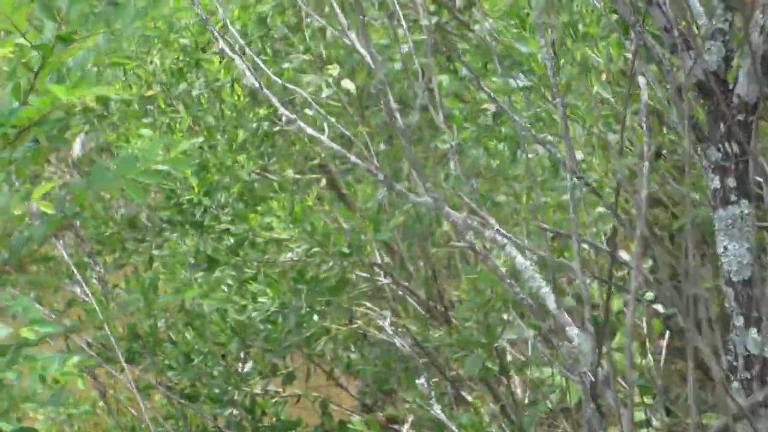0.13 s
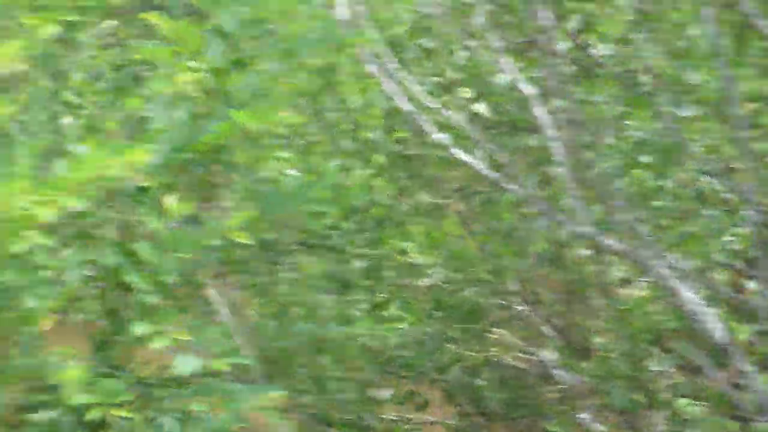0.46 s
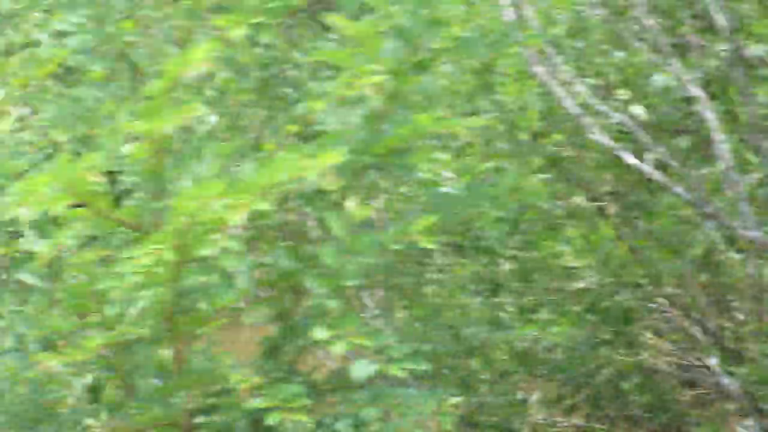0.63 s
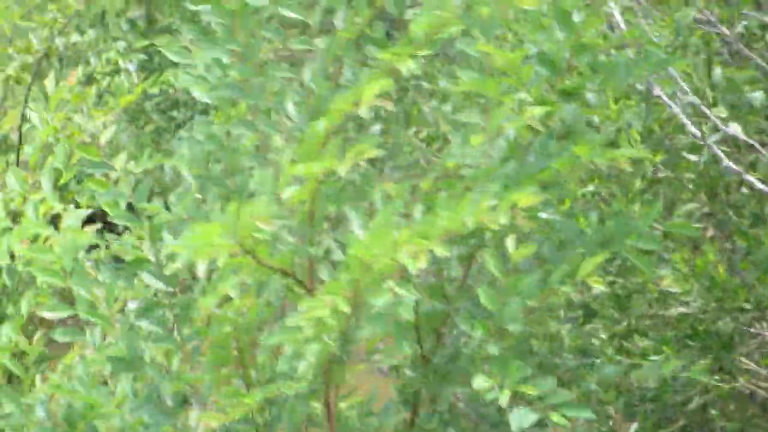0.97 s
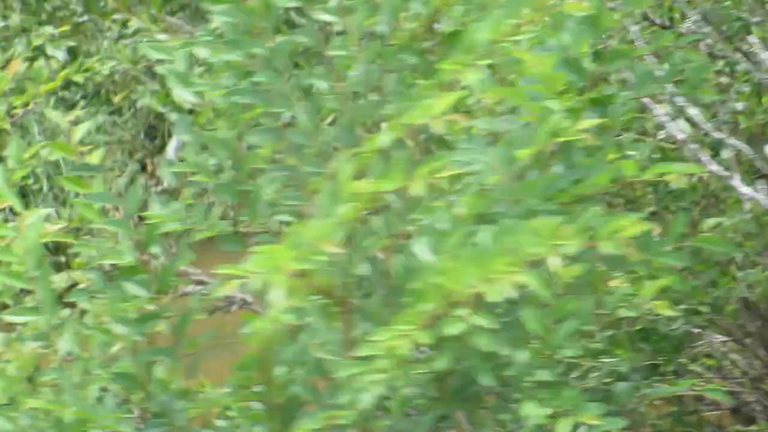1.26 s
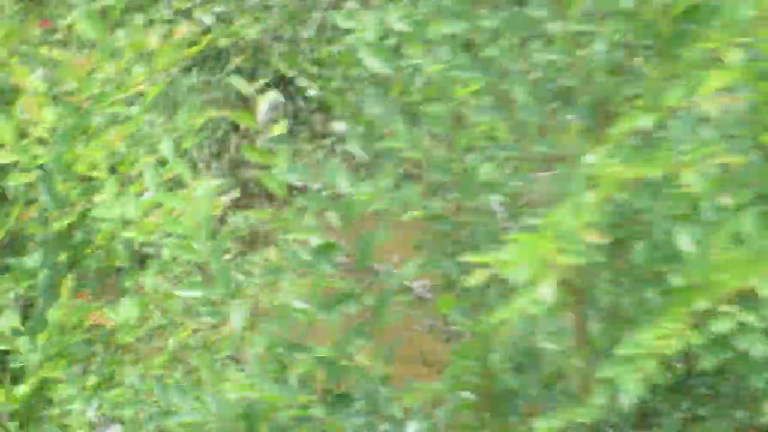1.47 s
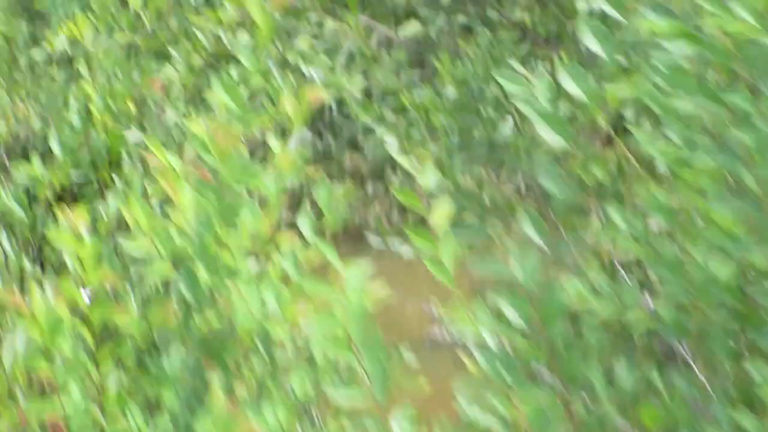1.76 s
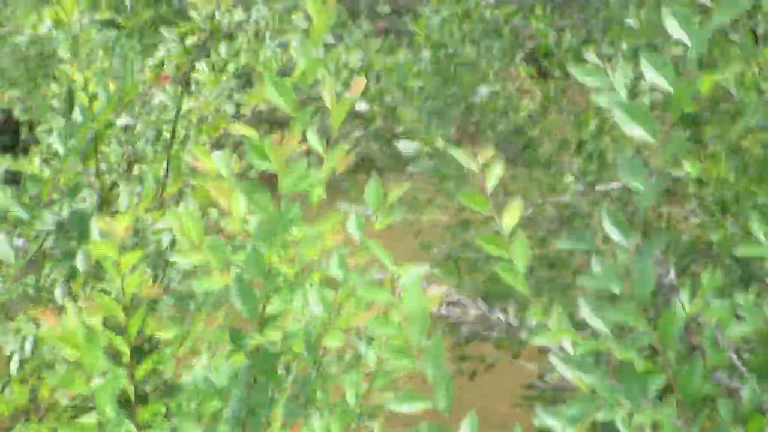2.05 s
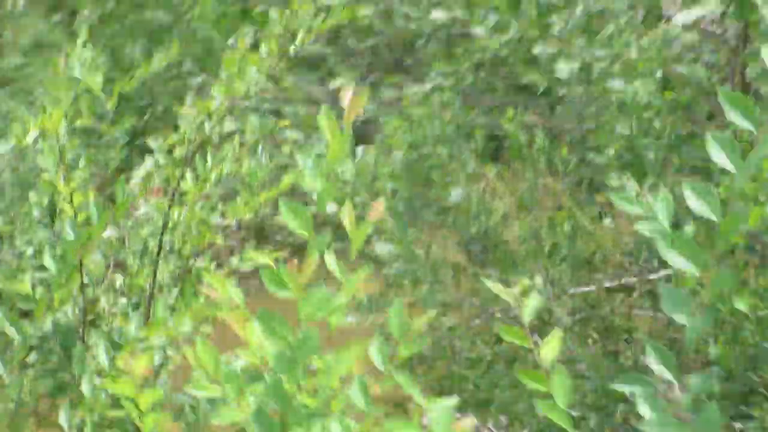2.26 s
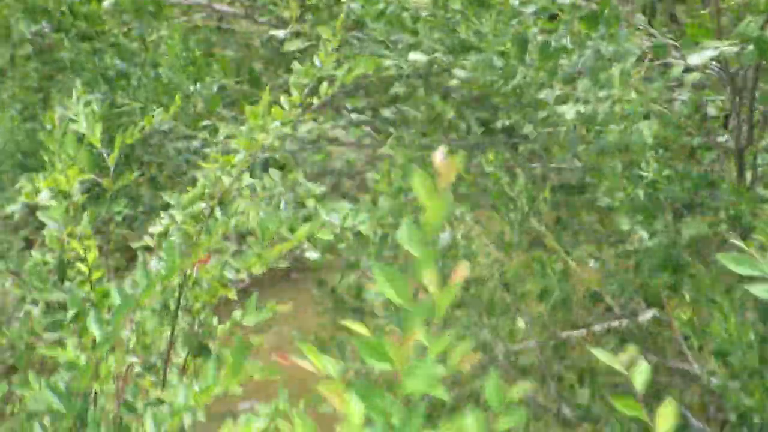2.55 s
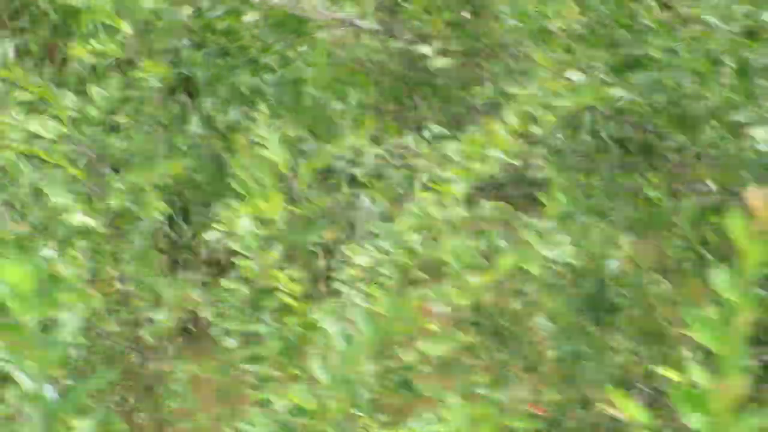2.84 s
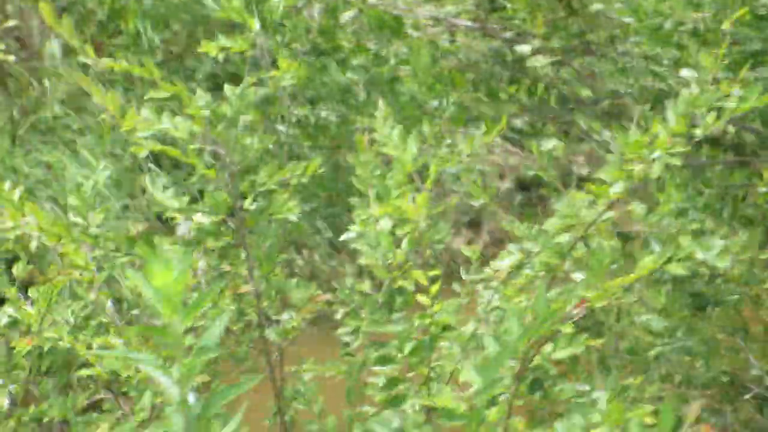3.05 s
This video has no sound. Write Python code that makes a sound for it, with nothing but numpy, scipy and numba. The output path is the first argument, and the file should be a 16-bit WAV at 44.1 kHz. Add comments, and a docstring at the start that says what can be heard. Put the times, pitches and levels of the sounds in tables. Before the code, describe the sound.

Sharp, very short chirps of small birds sweep upward at about 0.2, 0.5, 0.8 and 0.95 seconds, scattered by leaves, with faint farther whistles between. Distant traffic rumble, soft leaf hiss and a thin insect shimmer continue throughout. Wind thumps the camera microphone from 0.9 to 2.0, eases, then buffets hard from 2.4 onward; chirps return around 2.65, 2.75 and 2.95. Small twig ticks are scattered.

```python
"""A wash of distant road traffic and leaf hiss, shaped noise, runs throughout, with faint faraway whistles.
Small birds chirp in dense shrubs: gliding tones, each scattered by the leaves into a shimmering noise tail.
Thin bands of noise make insects, soft-edged bursts of ringing make twig ticks, and gusts of filtered
impulses with single thumps buffet the camera's microphone. The camera's gain control dips under
strong gusts, and two faint high tones of its electronics beat together."""
import sys
import numpy as np
from scipy import signal
from scipy.fft import rfft, irfft
from scipy.io import wavfile
from scipy.ndimage import uniform_filter1d
from numba import njit

SR = 44100
rng = np.random.default_rng(int(sys.argv[2]) if len(sys.argv) > 2 else 0)


def persist_wave(psi):
    """Save psi, clipped to +-1, as 16-bit WAV."""
    counts = np.round(np.clip(psi, -1, 1) * 32767).astype(np.int16)
    wavfile.write(sys.argv[1], SR, np.atleast_2d(counts).T)


N = 141561
T = np.arange(N) / SR  # time in s
F = np.maximum(np.arange(N // 2 + 1) * SR / N, 1)  # spectrum bins in Hz


def undb(db):
    """Decibels to gain."""
    return 10 ** (np.asarray(db) / 20)


def level(x, db):
    """Scale to an rms level."""
    return x * undb(db) / np.sqrt(np.mean(x ** 2))


def over_hz(table, order=1):
    """Read one column of a frequency table at every bin, evenly in log frequency."""
    table = np.array(table)
    return np.interp(np.log(F), np.log(np.maximum(table[:, 0], 1)), table[:, order])


def pan(x, db):
    """Place a sound by its level difference, left over right."""
    return x * undb(np.array([[db / 2], [-db / 2]]))


def walk(rate):
    """Random levels held 1 / rate s and smoothed twice; spread 1."""
    hold = int(SR / rate)
    steps = np.repeat(rng.standard_normal(N // hold + 1), hold)
    x = uniform_filter1d(uniform_filter1d(steps, hold), hold)[:N]
    return x / x.std()


def road():
    """Distant traffic and leaf hiss: noise that reaches the left port first, each octave flickering."""
    # spectrum of the wash before its overall level is set: f/Hz, level/dB per Hz
    wash = [(18, -57.5), (30, -23), (64, -4.5), (104, 2.5), (167, -3), (260, -7.5), (360, -13), (680, -14),
            (1000, -12.5), (1860, -23), (3000, -35), (4000, -42), (5000, -45), (6000, -41), (8300, -46.5),
            (9500, -54), (12000, -58.5), (15500, -63)]
    # likeness of the two channels: f/Hz, likeness (0 to 1)
    likeness = [(50, .9995), (120, .997), (250, .97), (500, .84), (1000, .9), (2000, .7), (4500, .7),
                (8500, .55), (13000, .35)]
    # balance of the wash: f/Hz, left over right level/dB
    balance = [(100, -6), (310, 4.5), (540, -2), (940, -0.5), (2830, -2), (4900, 1), (8500, 0.5)]
    road_db, left_lead_s = -29, 0.00009
    flicker_db, flicker_per_s = 0.42, 3.98
    alike = np.clip(over_hz(likeness), 0, 1)
    shared, own_left, own_right = rfft(rng.standard_normal((3, N)))
    common = np.sqrt(alike) * shared
    apart = np.sqrt(1 - alike)
    tilt = undb(over_hz(balance) / 2)
    left = (common * np.exp(2j * np.pi * F * left_lead_s) + apart * own_left) * tilt
    right = (common + apart * own_right) / tilt
    spec = np.array([left, right]) * undb(over_hz(wash))
    out = 0
    for octave in range(10):
        # overlapping octaves centred on 32 Hz and its doublings
        band = np.cos(np.pi / 2 * np.clip(np.log2(F / 32) - octave, -1, 1)) ** 2
        out = out + irfft(spec * band, N) * undb(flicker_db * walk(flicker_per_s))
    return level(out, road_db)


def through_air(x):
    """Distance dulls the top of the bird calls; they reach the left port first."""
    left_lead_s, dull_hz = 0.00014, 13600
    lead = np.exp(2j * np.pi * F * left_lead_s * np.array([[1], [0]]))
    return irfft(rfft(x) * lead / np.sqrt(1 + (F / dull_hz) ** 20), N)


def leaf_scatter(wet_db, t60_s):
    """Direct sound, then noise fading at three rates as leaves return it, partly alike left and right."""
    early_t60_s, early_db = 0.11, 1
    late_t60_s, late_db = 0.68, -20.5
    t = T[:SR // 2]
    early = undb(early_db - 60 * t / early_t60_s)
    late = undb(late_db - 60 * t / late_t60_s)
    noise = rng.standard_normal((3, len(t)))
    tail = (noise[:2] + 0.5 * noise[2]) * (early + undb(-60 * t / t60_s) + late)
    tail = tail * undb(wet_db) / np.sqrt(np.sum(tail ** 2, axis=1, keepdims=True))
    tail[:, 0] = 1  # the direct sound
    return tail


def birds(calls, attack_share, t60_s):
    """Whistled glides with one overtone, each heard direct and scattered by the leaves around its perch."""
    release_s, flutter_db, flutter_per_s = 0.0034, 3.5, 250
    overtone_fade_db = -8  # the overtone weakens over the note
    out = np.zeros((2, N + 2 * SR))  # room for the last tails
    flutter = undb(flutter_db * walk(flutter_per_s))
    for start, length, first, middle, last, db, swell_db, over_db, wet_db, pan_db in calls:
        i = int(max(start, 0) * SR)
        u = T[:int(length * SR)] / length  # progress through the note, 0 to 1
        # a parabola through the first, middle and last pitch
        hz = first + (4 * middle - 3 * first - last) * u + 2 * (first + last - 2 * middle) * u ** 2
        phase = 2 * np.pi * np.cumsum(hz) / SR
        attack = np.minimum(u / attack_share, 1)
        release = np.minimum((1 - u) * length / release_s, 1)
        loudness = np.sqrt(2) * undb(db + swell_db * (u + 0.5))
        overtone = undb(over_db + overtone_fade_db * u) * np.sin(2 * phase)
        note = loudness * attack * release * flutter[i:i + len(u)] * (np.sin(phase) + overtone)
        heard = signal.fftconvolve(pan(note, pan_db), leaf_scatter(wet_db, t60_s), axes=1)
        out[:, i:i + heard.shape[1]] += heard
    return through_air(out[:, :N])


def far_birds():
    """Farther whistles with a quick attack and a shorter scatter."""
    # calls: start t/s, length t/s, first f/Hz, middle f/Hz, last f/Hz, level/dB before swell,
    # swell over the note/dB, overtone at the start/dB, leaf scatter over direct/dB, left over right/dB
    far_calls = [(.0, .012, 4300, 3950, 3600, -68, 0, -40, 8, 0),
                 (.37, .03, 2700, 2900, 3050, -62, 0, -40, 2, 0),
                 (.4, .05, 3100, 3550, 3450, -67, 0, -40, 4, 0),
                 (.455, .03, 3200, 3000, 2900, -59, 0, -40, 0, 0),
                 (1.58, .055, 3200, 3700, 4250, -64, -4, -40, 0, 0),
                 (1.635, .125, 4300, 3850, 2900, -63, 4, -40, 0, 0),
                 (2.027, .02, 10600, 8600, 7850, -65, 14, -40, 0, 0),
                 (2.062, .017, 4700, 3950, 3350, -58, 6, -40, -6, 0),
                 (2.425, .235, 6750, 6630, 6600, -65, 2, -40, -6, 0)]
    return birds(far_calls, attack_share=0.1, t60_s=0.21)


def near_birds():
    """Close chirps that rise in pitch, with a slower attack and a longer scatter."""
    # chirps: start t/s, length t/s, first f/Hz, middle f/Hz, last f/Hz, level/dB before swell,
    # swell over the note/dB, overtone at the start/dB, leaf scatter over direct/dB, left over right/dB
    near_chirps = [(.209, 0.035, 5100, 6920, 8200, -51, 3, -9.5, 10.5, 2),
                   (.492, 0.037, 6200, 7230, 8080, -53.5, 5, -15, 9, 2.5),
                   (.62, 0.02, 7000, 7400, 8200, -70, 0, -30, 11, 4),
                   (.819, 0.047, 5700, 7100, 8370, -56, 3, -15, 11.5, 2),
                   (.956, .042, 6330, 7280, 8300, -56.5, 0.5, -22, 12.5, 3.5),
                   (2.654, 0.032, 6150, 7300, 8330, -57.5, 6.5, -24, -5, 1),
                   (2.744, 0.026, 7200, 7540, 8450, -45, -2, -32, -5, 4),
                   (2.932, .043, 5770, 7050, 8220, -53, 6.5, -12, 5, 3.5)]
    return birds(near_chirps, attack_share=0.3, t60_s=0.27)


def insects():
    """Thin wavering bands of noise high in the treble, separate in each channel."""
    # bands: centre f/Hz, width f/Hz, level/dB before fades, middle of fade-in t/s, middle of fade-out t/s
    bands = [(8750, 25, -75.5, 0.5, .6), (8210, 290, -69, -0.7, 3.2), (8000, 150, -69, 1.5, 2.25)]
    fade_s = 0.2
    out = 0
    for hz, width, db, start, end in bands:
        noise = rfft(rng.standard_normal((2, N)))
        band = irfft(noise * np.exp(-((F - hz) / width) ** 2), N)
        fade = np.clip(np.minimum(T - start, end - T) / fade_s + 0.5, 0, 1)
        out = out + level(band, db) * fade
    return out


def gusts():
    """Random impulses of uneven size, filtered to a rumble that swells and brightens with the wind."""
    # wind strength at the microphone before calm and trim: t/s, level/dB
    strengths = [(0.4, -36.5), (0.89, -29.5), (0.91, -16.5), (1.01, -31), (1.05, -13.5), (1.16, -23),
                 (1.19, -15.5), (1.28, -30.5), (1.36, -19.5), (1.38, -31.5), (1.45, -15.5), (1.51, -31),
                 (1.58, -19), (1.61, -29), (1.83, -15.5), (1.85, -29.5), (1.99, -20.5), (2.02, -48.5),
                 (2.07, -21), (2.11, -56), (2.17, -39.5), (2.39, -28), (2.42, -16), (2.51, -3.5),
                 (2.58, -14.5), (2.61, -16), (2.63, -41), (2.66, -14.5), (2.7, -26), (2.72, -15.5),
                 (2.76, -13.5), (2.86, -19.5), (2.89, -18.5), (3.0, -17), (3.04, -13), (3.2, -21.5)]
    # relative spectrum of the rumble: f/Hz, level/dB per Hz
    rumble = [(15, -42.5), (25, -32), (55, -0.5), (220, -10), (350, -14.5), (389, -17.5), (458, -20),
              (557, -25), (900, -35.5), (1170, -64), (1980, -120)]
    eddies_per_s, eddy_spread_db, trim_db = 500, 2, -4
    calm_db = -34.5  # at or below this no wind is heard
    edge_hz, edge_per_db = 280, 0.36  # above the edge, extra dB for each dB of wind
    strengths = np.array(strengths)
    db = np.interp(T, strengths[:, 0], strengths[:, 1])
    draw = rng.random((3, N))
    struck = draw[0] < eddies_per_s / SR
    size = undb(-eddy_spread_db * np.log(draw[2] + 1e-9))
    eddies = struck * np.sign(draw[1] - 0.5) * size
    spec = rfft(eddies) * undb(over_hz(rumble))
    low_share = 1 / (1 + (F / edge_hz) ** 4)
    low = irfft(spec * low_share, N)
    high = irfft(spec * (1 - low_share), N)
    scale = np.sqrt(np.mean((low + high) ** 2))
    strength = np.sqrt(np.maximum(undb(db) ** 2 - undb(calm_db) ** 2, 0))
    brightness = undb(edge_per_db * (db - strengths[:, 1].max()))
    return strength * undb(trim_db) * (low + high * brightness) / scale


def thumps():
    """Single strong eddies: a sharp suck, then a slower swing that dies away."""
    # eddies: t/s, nominal level/dB, f/Hz at the turn from suck to swing
    strong_eddies = [(0.913, -19, 220), (1.038, -21, 220), (1.094, -18.5, 220), (1.181, -20, 220),
                     (1.252, -21.5, 220), (1.36, -15.5, 220), (1.42, -12, 220), (1.444, -12, 220),
                     (1.568, -10, 220), (1.658, -16.5, 220), (1.751, -22.5, 204), (1.814, -18, 220),
                     (1.893, -20.5, 220), (1.946, -19.5, 220), (2.43, -27, 220), (2.461, -13, 219),
                     (2.479, -13, 218), (2.517, -8, 220), (2.594, -2.5, 220), (2.639, -13, 220),
                     (2.654, -16, 218), (2.724, -6.5, 220), (2.756, -7, 220), (2.789, -10, 220),
                     (2.89, -11, 220), (3.039, -12, 220), (3.057, -12.5, 228), (3.105, -12.5, 220)]
    rise_s, slowing, damping = 0.005, 0.75, 0.16  # the suck turns to the swing rise_s after the listed time
    out = np.zeros(N)
    for s, db, hz in strong_eddies:
        u = (T - s - rise_s) * 2 * np.pi * hz
        after = np.maximum(u, 0)
        suck = 2.01 * u * np.exp(-u ** 2 / 2)
        swing = 1.46 * np.sin(((1 + after) ** slowing - 1) / slowing) * np.exp(-damping * after)
        out += undb(db) * np.where(u < 0, suck, swing)
    return out


def wind():
    """Gusts and thumps push on the two ports; the left gets them later and duller."""
    # left channel against right: f/Hz, level/dB, lag/rad
    left_against_right = [(30, 0, 0), (45, .7, .08), (86, 1.7, .2), (130, 3, .3), (172, 4, .8),
                          (215, 3, 1.2), (260, 1.5, 1.5), (345, -3, 1.7), (430, -6.5, 1.9), (650, -10, 2.)]
    fade_s = 0.02  # short fade to silence at the end of the push, so the filtered ends join smoothly
    push = (gusts() + thumps()) * np.minimum((T[-1] - T) / fade_s, 1)
    spec = rfft(push)
    left = undb(over_hz(left_against_right)) * np.exp(-1j * over_hz(left_against_right, order=2))
    middle = np.abs(1 + left) / 2  # keeps the level of the two ports' average
    return np.array([irfft(spec * left / middle, N), irfft(spec / middle, N)])


def ticks():
    """Twig ticks, each a brief burst of ringing with soft edges."""
    # ticks: centre t/s, peak level/dB, centre f/Hz, width f/Hz, left over right level/dB
    twigs = [(.8695, -36.5, 12000, 8000, 13), (.961, -52, 10500, 2500, 0), (.967, -46, 10500, 2500, 7),
             (.977, -41, 10000, 4000, 0), (1.257, -43, 10000, 3000, -3), (1.258, -29.5, 2200, 1500, 0),
             (1.273, -42, 11000, 8000, 0), (1.817, -34.5, 5000, 5000, -5), (1.889, -42, 4500, 2000, 0),
             (1.914, -48, 11000, 5000, -3), (1.94, -49, 10000, 5000, -7), (2.517, -40, 10000, 6000, 2.5),
             (2.762, -44, 10500, 4000, 9), (3.169, -50, 11000, 5000, 4)]
    out, t = np.zeros((2, N)), T[:128] - T[64]
    for s, db, hz, width, pan_db in twigs:
        i = int(s * SR) - len(t) // 2
        burst = np.exp(-(2 * width * t) ** 2) * np.cos(2 * np.pi * hz * t)
        out[:, i:i + len(t)] += pan(undb(db) * burst, pan_db)
    return out


def scene():
    """Road, birds, insects, wind and twigs as they reach the microphone."""
    return road() + far_birds() + near_birds() + insects() + wind() + ticks()


@njit
def follow(x, up, down):
    """Envelope that rises fast and falls slowly."""
    y, e = np.empty(len(x)), x[0]
    for i in range(len(x)):
        e += (x[i] - e) * (up if x[i] > e else down)
        y[i] = e
    return y


def electronics():
    """Two faint steady tones of the camera electronics, close enough in pitch to beat."""
    whine_hz, beat_hz, whine_db = 15734, 13.5, -81
    partner_db, partner_phase = -7, 0.92  # against the main tone; phase in rad
    main = np.sin(2 * np.pi * whine_hz * T)
    partner = np.sin(2 * np.pi * (whine_hz + beat_hz) * T + partner_phase)
    return undb(whine_db) * (main + undb(partner_db) * partner)


def record(dry):
    """The camera's gain control ducks under gusts; its faint tones are added and the top is cut."""
    top_db, ratio, attack_s, release_s = -21, 1.45, 0.018, 0.3
    top_hz = 15850
    env = follow(np.abs(dry).mean(axis=0), 1 / (attack_s * SR), 1 / (release_s * SR))
    gain = np.minimum(undb(top_db) / (env + 1e-9), 1) ** (1 - 1 / ratio)
    # 0.2 dB ripple below the cut, 80 dB down above it
    low_pass = signal.ellip(10, 0.2, 80, top_hz, fs=SR, output="sos")
    return signal.sosfilt(low_pass, dry * gain + electronics())


dry = scene()
out = record(dry)
persist_wave(out)
```